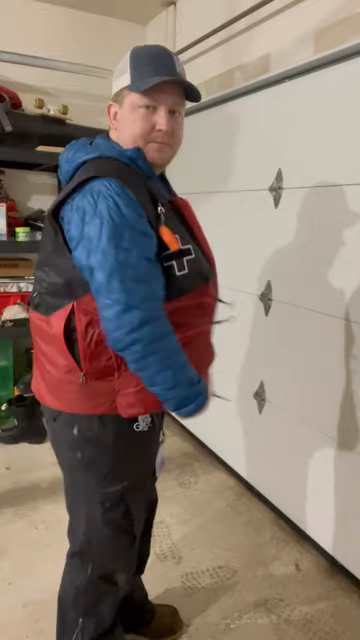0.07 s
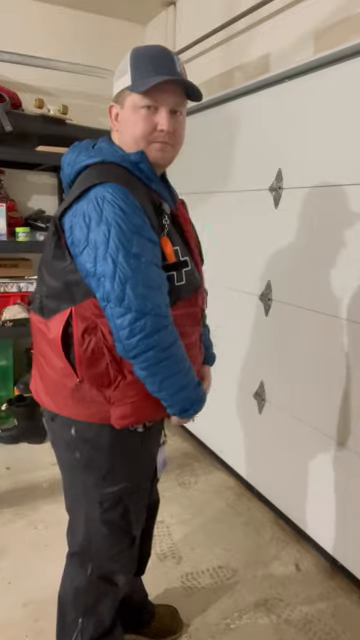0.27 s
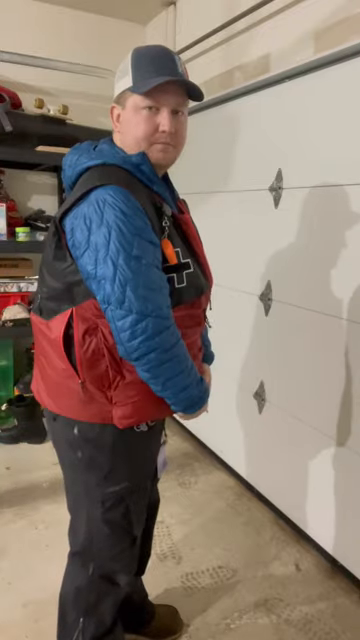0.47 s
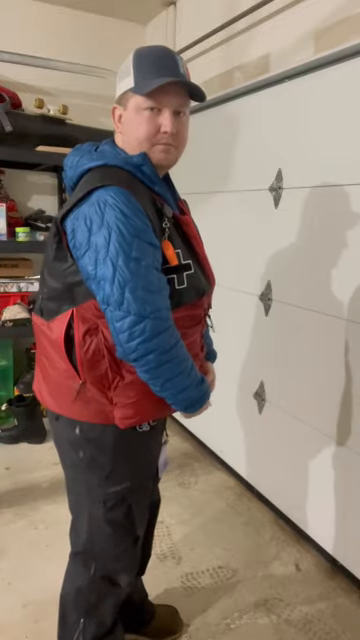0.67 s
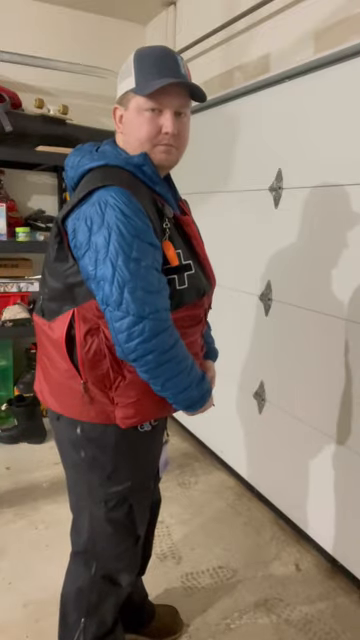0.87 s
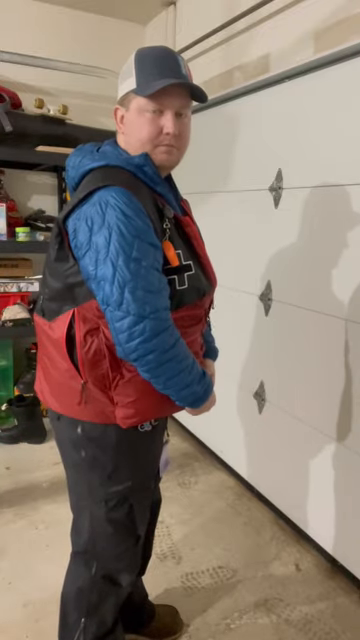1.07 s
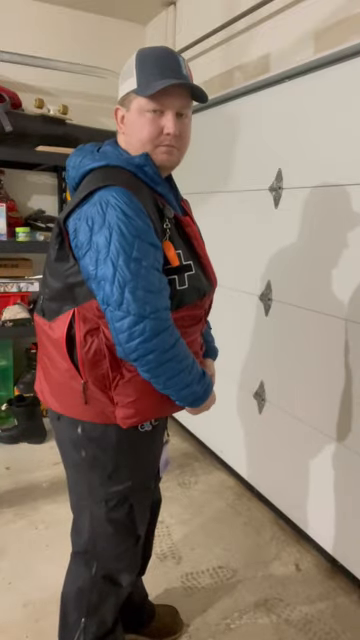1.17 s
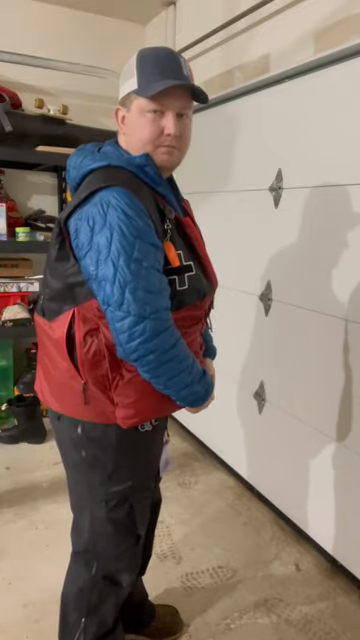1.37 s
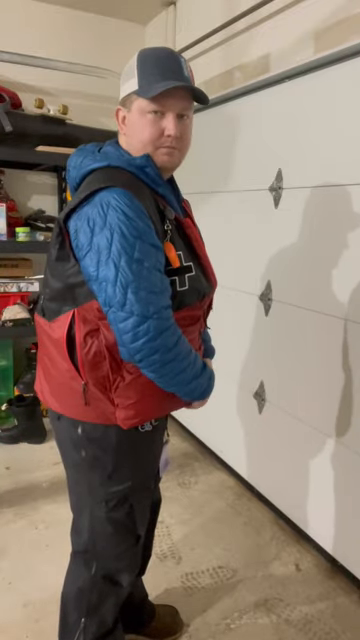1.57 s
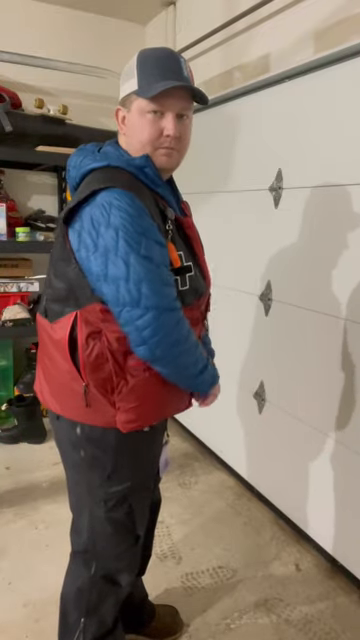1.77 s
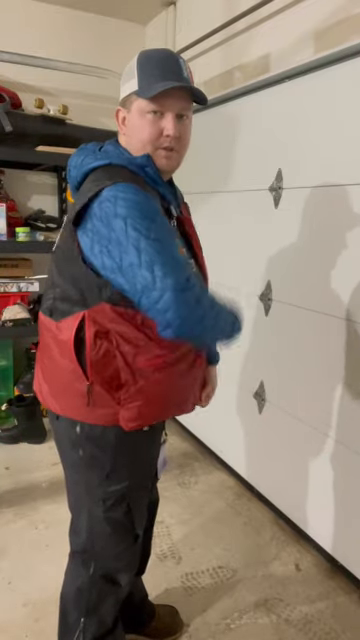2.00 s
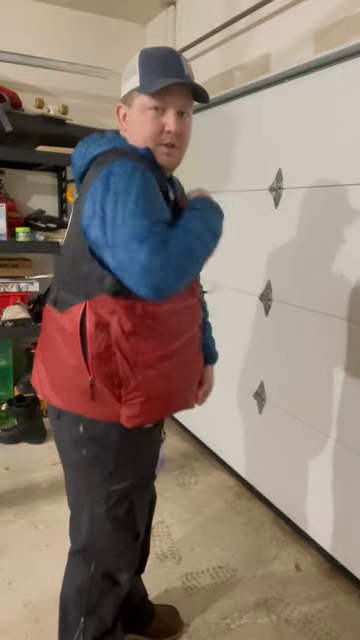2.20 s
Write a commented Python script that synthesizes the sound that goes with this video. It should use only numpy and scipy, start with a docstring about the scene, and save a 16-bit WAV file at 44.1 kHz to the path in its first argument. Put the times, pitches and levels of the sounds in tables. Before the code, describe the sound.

Nylon clothing rustle in a bare garage, heard by a phone a few metres off: a settling swish, near quiet with small fabric ticks, then a sudden thick scrunch over faint hiss and low rumble.

```python
"""A hard garage: a padded nylon jacket and vest rustle faintly as the wearer settles, with crackles and ticks;
then an arm drags hard across the front in one crumpling scrunch, over faint hiss and low rumble.
Rustle is coloured grains and hiss, the drag coloured noise with swelling sine folds, ticks are resonated clicks.
A phone a few metres off hears the treble out of step at its two ports, plus scattered noise unrelated per port."""
import sys
import numpy as np
from scipy import signal
from scipy.fft import rfft, irfft
from scipy.io import wavfile
from scipy.ndimage import uniform_filter1d

SR = 44100
rng = np.random.default_rng(int(sys.argv[2]) if len(sys.argv) > 2 else 0)


def wrap_up_sound(samples):
    """Save the sound to the file named by the first command line argument, as 16-bit audio."""
    columns = np.atleast_2d(samples).T
    # keep every value between -1 and 1, then stretch to whole-number steps
    tamed = np.clip(columns, -1, 1)
    steps = np.round(tamed * 32767).astype(np.int16)
    wavfile.write(sys.argv[1], SR, steps)


N = 98695

# arm dragging over the padding: [t/s, low-band level/dB, high band over low/dB]
DRAG = [(1.83, -59, 7), (1.852, -37, -7.5), (1.88, -35.5, -3), (1.942, -28, -10.5), (1.964, -30.5, -11),
        (2.008, -26.5, -6.5), (2.118, -35, -0.5), (2.142, -35, 2.5), (2.214, -36.5, -5.5),
        (2.237, -47.5, 0)]


def undb(db):
    """Amplitude ratio from dB."""
    return 10 ** (np.asarray(db) / 20)


def unit(x):
    """Scale to unit RMS."""
    return x / np.sqrt(np.mean(x ** 2))


def curve(table, column):
    """Table column interpolated linearly over time."""
    rows = np.array(table)
    return np.interp(np.arange(N) / SR, rows[:, 0], rows[:, column])


def on_log(table, hz):
    """Spectrum in dB interpolated over log frequency, -90 dB outside the table."""
    rows = np.array(table)
    return np.interp(np.log(np.maximum(hz, 1)), np.log(rows[:, 0]), rows[:, 1], left=-90, right=-90)


def walk(steps_per_s):
    """Random levels, each held one step, then smoothed twice over a step."""
    step = int(SR / steps_per_s)
    held = np.repeat(rng.standard_normal(N // step + 1), step)
    slewed = uniform_filter1d(uniform_filter1d(held, step), step)
    return 1.3 * slewed[:N]


def textured(x, spectrum, flicker_db, steps_per_s):
    """Colour x by a spectrum, in half-octave bands that each flicker alone; unit RMS."""
    hz = np.fft.rfftfreq(N, 1 / SR)
    coloured = rfft(x) * undb(on_log(spectrum, hz))
    half_octave = 2 * np.log2(np.maximum(hz, 1))
    first, last = (int(2 * np.log2(row[0])) for row in (spectrum[0], spectrum[-1]))
    out = 0
    for band in range(first, last + 2):
        weight = np.clip(1 - abs(half_octave - band), 0, 1)
        out = out + irfft(coloured * weight, N) * undb(flicker_db * walk(steps_per_s))
    return unit(out)


def drag():
    """The arm crumples the padding: low and high noise bands flicker under one level curve."""
    # [f/Hz, relative level/dB]
    low_spectrum = [(29, -59), (50, -35), (129, -11), (173, -19.5), (231, -4.5), (305, -1), (423, 0.5),
                    (800, -7), (1040, -42), (1760, -120)]
    high_spectrum = [(470, -36), (800, -7), (860, 1), (1080, 0.5), (1330, -3), (2200, -11), (2860, -54),
                     (4840, -120)]
    flicker_db, steps_per_s, onset_s = 4, 44.98, 0.0076
    moving = np.clip((np.arange(N) / SR - DRAG[0][0]) / onset_s, 0, 1)
    low = textured(rng.standard_normal(N), low_spectrum, flicker_db, steps_per_s)
    high = textured(rng.standard_normal(N), high_spectrum, flicker_db, steps_per_s)
    return moving * undb(curve(DRAG, 1)) * (low + high * undb(curve(DRAG, 2)))


def folds():
    """The loudest folds: short hollow sines in Gaussian swells, each with its own phase split between ports."""
    # [centre t/s, f/Hz, Gaussian 1/e half-width/s, peak/dB]
    fold_table = [(1.857, 300, 0.0083, -34), (1.913, 597.6, 0.021, -30), (1.94, 431.3, 0.0047, -17),
                  (1.986, 399.6, 0.015, -30.5), (1.997, 1324, 0.0074, -30.5), (2.007, 243.1, 0.0084, -22),
                  (2.02, 376.7, .008, -24.5), (2.036, 568.6, 0.013, -24), (2.038, 1248, 0.0092, -26.5),
                  (2.056, 661, 0.0103, -28), (2.061, 1109, 0.013, -28.5), (2.086, 487, 0.019, -28),
                  (2.097, 968, 0.011, -25.5), (2.112, 1026, 0.0034, -25.5), (2.138, 1077, 0.011, -26),
                  (2.142, 538.4, 0.019, -21), (2.171, 751, 0.011, -28), (2.175, 481.4, 0.0039, -23.5),
                  (2.179, 250, 0.0069, -29.5), (2.203, 552.4, 0.013, -32.5), (2.224, 1077, 0.014, -36.5)]
    wobble_depth, spread_turns = .04, 0.14
    t = np.arange(N) / SR
    warped_s = np.cumsum(1 + wobble_depth * walk(90)) / SR
    side = np.array([[1], [-1]])
    out = 0
    for (s, hz, half_width_s, db), (turn, lean) in zip(fold_table, rng.random((len(fold_table), 2))):
        split_turns = spread_turns * (2 * lean - 1) * min(hz / 450, 1) * side
        swell = undb(db) * np.exp(-((t - s) / half_width_s) ** 2)
        out = out + swell * np.sin(2 * np.pi * (hz * warped_s + turn + split_turns))
    return out


def fibres():
    """Dense tiny slips of uneven size over a smooth hiss."""
    grains_per_s, spread_db, top_db, grain_db = 1500, 3.2, 13, -1
    chance, sign, size = rng.random((3, N))
    size_db = np.minimum(-spread_db * np.log(size + 1e-9), top_db)  # exponential spread, capped
    slips = (chance < grains_per_s / SR) * np.sign(sign - .5) * undb(size_db)
    return undb(grain_db) * unit(slips) + rng.standard_normal(N)


def rustle():
    """Cloth rubs on cloth: body and sheen share the same slips; the padding's low swish has its own."""
    # [t/s, body level/dB, sheen over body/dB]
    rub_table = [(0, -41.5, -1.5), (.06, -42.5, -3.5), (.17, -45.5, 1), (.25, -51, -0.5), (.272, -51.5, 2),
                 (.28, -44.5, -1), (.31, -49, -3.5), (.44, -53.5, -3), (.5, -59, -3.5), (.56, -62, -4),
                 (.61, -54, -6), (.68, -57.5, -5.5), (.87, -62, -5), (.93, -58, -3), (.98, -59.5, -5),
                 (1.03, -68, -4), (1.08, -72, -7), (1.13, -69, -9.5), (1.25, -77.5, -1), (1.27, -63, -3.5),
                 (1.3, -60, -5.5), (1.372, -61, -6), (1.384, -50.5, -5), (1.41, -57.5, -6.5),
                 (1.444, -59.5, -5), (1.455, -51, -2.5), (1.48, -60, -5.5), (1.57, -53.5, -4),
                 (1.62, -49.5, -3.5), (1.7, -53, -6.5), (1.82, -56, -4.5), (1.85, -45, -2.5),
                 (1.9, -38.5, -2.5), (1.97, -36, -3), (2.05, -33.5, -1), (2.17, -37, -0.5),
                 (2.24, -45.5, -5.5)]
    # low swish of the padding: [t/s, level/dB]
    swish_table = [(0.0, -39), (0.192, -46.5), (0.214, -51.5), (0.294, -47), (0.304, -52.5), (0.392, -50.5),
                   (0.56, -58), (0.59, -53.5), (0.912, -62), (0.926, -52.5), (1.248, -73), (1.298, -56),
                   (1.36, -60.5), (1.386, -46), (1.442, -61.5), (1.452, -49), (1.502, -61), (1.626, -47),
                   (1.636, -52), (1.83, -58)]
    # [f/Hz, relative level/dB]
    body_spectrum = [(400, -35), (600, -4), (1000, -7.5), (1500, -4), (2500, -6), (4000, -10), (6000, -17)]
    sheen_spectrum = [(3000, -14.5), (4500, -12.5), (6300, -2.5), (8000, 0.5), (10000, -6), (12000, -6),
                      (14000, -13.5), (15900, -10.5)]
    pad_spectrum = [(71, -31), (120, -11), (167, -4), (484, 1), (679, -7.5), (779, -2.5), (1500, -14.5),
                    (1950, -37), (3300, -120)]
    flicker_db = 1.85
    slips = fibres()
    body_db = curve(rub_table, 1)
    before_drag = np.arange(N) / SR < DRAG[0][0] + .02
    body = textured(slips, body_spectrum, flicker_db, 15) * undb(body_db)
    sheen = textured(slips, sheen_spectrum, flicker_db, 14) * undb(body_db + curve(rub_table, 2))
    swish = textured(fibres(), pad_spectrum, 2.6, 30.05) * undb(curve(swish_table, 1)) * before_drag
    return body + sheen + swish


def ring(x, hz, width_hz):
    """Two-pole resonance, gain 1 at the centre."""
    return signal.lfilter(*signal.iirpeak(min(hz, .45 * SR), hz / width_hz, SR), x)


def ticks():
    """Creases snap: a sharp click with a faint noisy tail, passed twice through a resonance at its own pitch."""
    # crackles and ticks: [t/s, peak/dB, f/Hz, Q of each pass]
    tick_table = [(.273, -32, 3000, .7), (0.2777, -33, 2480, .7), (.518, -47.5, 11000, 3.9),
                  (.52, -47, 800, 1.1), (.606, -41.5, 890, 0.87), (0.618, -45, 1800, 2.9),
                  (.762, -42, 690, 0.7), (0.936, -43, 10500, 1.5), (.97, -46.5, 1010, 1.3),
                  (1.138, -51.5, 1910, 1.3), (1.2568, -43.5, 4900, 3), (1.262, -66, 4050, 2.6),
                  (1.378, -34.5, 2290, 0.59), (1.381, -30, 3470, 0.31), (1.4473, -43, 2500, 0.51),
                  (1.4495, -38.5, 3500, 0.57), (1.452, -41.5, 3700, 0.7), (1.499, -45, 6500, 2.4)]
    click_decay_s, tail_decay_s, tail_db = .00006, .004, -19
    length = 1500  # samples
    t = np.arange(length) / SR
    out = np.zeros(N)
    click = np.exp(-t / click_decay_s)
    tail = undb(tail_db) * np.exp(-t / tail_decay_s)
    for (s, db, hz, q), noise in zip(tick_table, rng.standard_normal((len(tick_table), length))):
        burst = ring(ring(click + noise * tail, hz, hz / q), hz, hz / q)
        start = int(s * SR)
        out[start:start + length] += burst / abs(burst).max() * undb(db)
    return out


def garage():
    """Faint steady-level hiss of the room over a wavering rumble, both coloured noise."""
    # [f/Hz, relative level/dB]
    air_spectrum = [(100, -17), (170, 1.5), (198, 3.5), (937, -9), (1750, -23), (1890, -11), (2080, -19),
                    (15800, -36)]
    rumble_spectrum = [(12, -46), (20, -19), (41, -9), (54, 5), (91, -5), (129, 2), (170, -16), (220, -42),
                       (370, -120)]
    # [t/s, level/dB]
    rumble_table = [(0.0, -54.5), (0.27, -62.5), (1.22, -64), (1.41, -54.5), (1.52, -62.5), (1.79, -59),
                    (1.83, -73), (1.97, -50), (2.05, -63), (2.08, -47), (2.16, -66), (2.24, -50)]
    air_db = -69
    air = textured(rng.standard_normal(N), air_spectrum, 2.0, 7.55) * undb(air_db)
    rumble = textured(rng.standard_normal(N), rumble_spectrum, 2.8, 8) * undb(curve(rumble_table, 1))
    return air + rumble


def scene():
    """Direct sound reaches both ports out of step; the walls scatter an unrelated share of the noise to each."""
    # phase between ports: [f/Hz, left lead/rad]
    port_table = [(0, 0), (250, .2), (860, 1.2), (1120, .3), (2300, -1.2), (3530, .5), (4500, -1.2),
                  (6250, .2), (7200, 1.9), (8800, 3.14), (11700, 6.28), (14600, 9.42), (15900, 11)]
    # [f/Hz, scattered over direct/dB]
    wet_table = [(30, -7), (60, -8), (130, -15), (300, 0), (700, 4), (2000, 3), (5000, 5), (7500, -11),
                 (15000, -12)]
    left_over_right_db = -0.6

    def noise():
        """Spectrum of a fresh draw of all the noise layers."""
        return rfft(rustle() + drag() + garage())

    hz = np.fft.rfftfreq(N, 1 / SR)
    side = np.array([[1], [-1]])  # left, right
    lead_rad = np.interp(hz, *np.array(port_table).T)
    wet_held_at_ends = [(1, wet_table[0][1])] + wet_table + [(SR, wet_table[-1][1])]
    wet = undb(on_log(wet_held_at_ends, hz))
    keep = 1 / np.sqrt(1 + wet ** 2)  # direct + scattered power stays 1
    direct = rfft(ticks() + folds()) + keep * noise()
    scattered = keep * wet * np.array([noise(), noise()])
    ports = irfft(direct * np.exp(.5j * side * lead_rad) + scattered, N)
    return ports * undb(side * left_over_right_db / 2)


def record(dry):
    """The phone cuts the top: steep elliptic low-pass."""
    top_hz, ripple_db, stop_db = 15850, .2, 80
    return signal.sosfilt(signal.ellip(10, ripple_db, stop_db, top_hz, fs=SR, output="sos"), dry)


dry = scene()
out = record(dry)
wrap_up_sound(out)
```